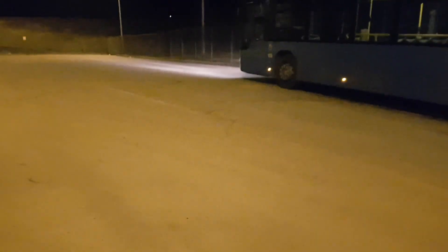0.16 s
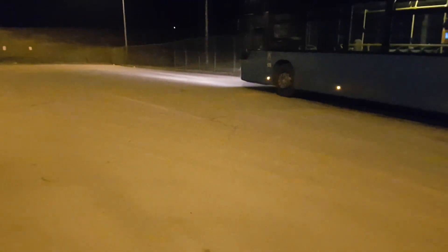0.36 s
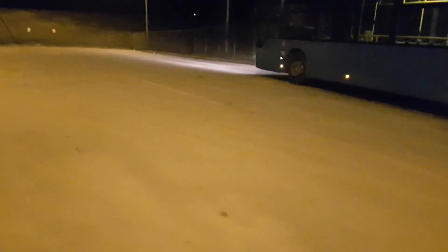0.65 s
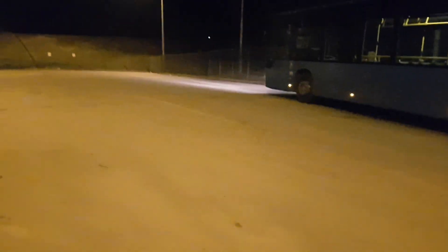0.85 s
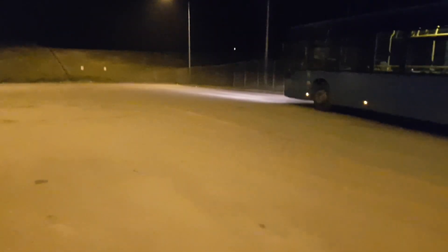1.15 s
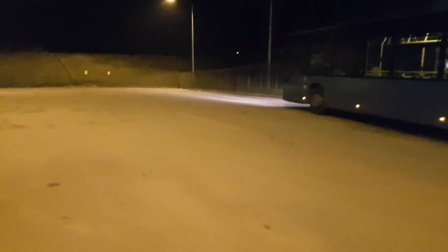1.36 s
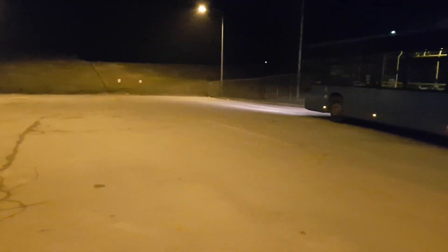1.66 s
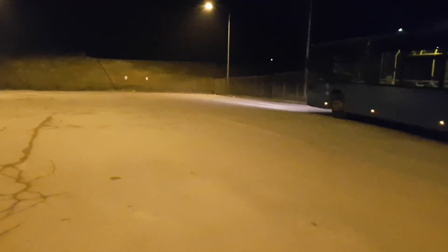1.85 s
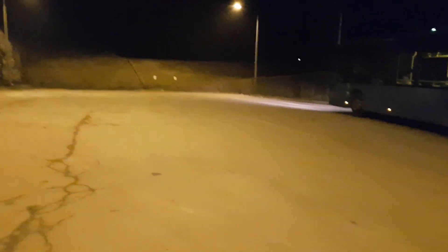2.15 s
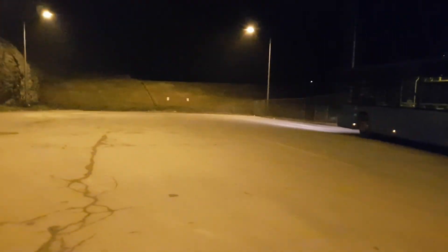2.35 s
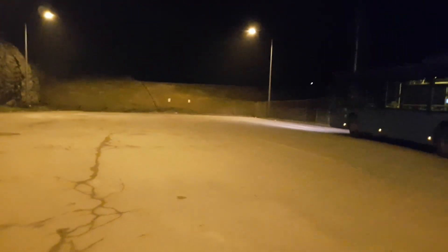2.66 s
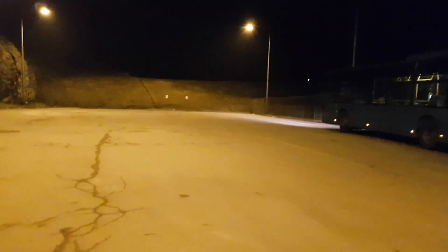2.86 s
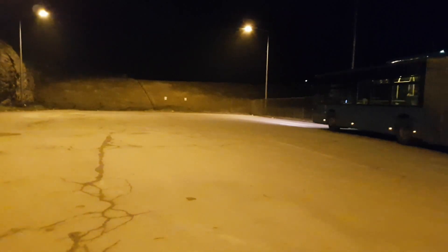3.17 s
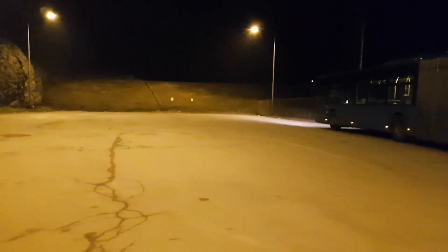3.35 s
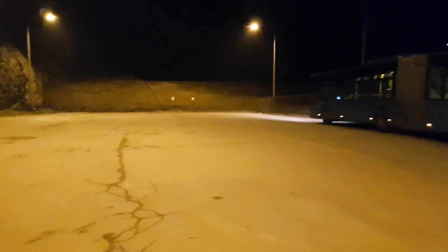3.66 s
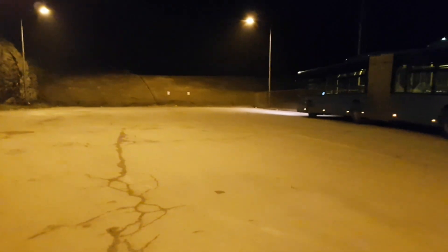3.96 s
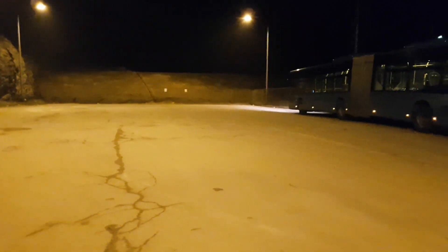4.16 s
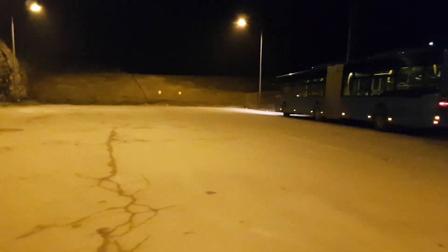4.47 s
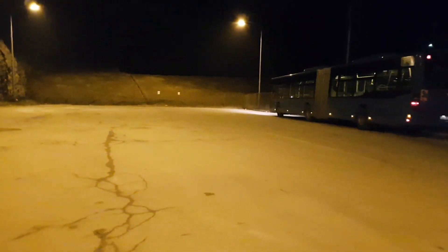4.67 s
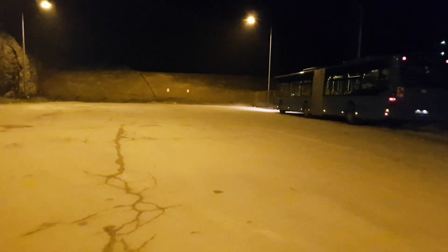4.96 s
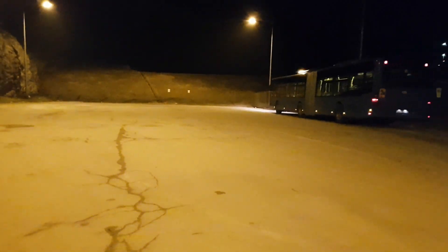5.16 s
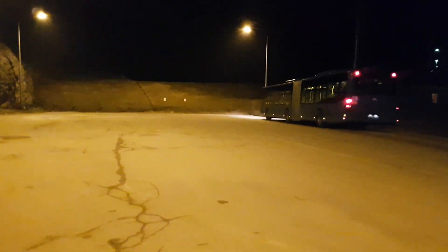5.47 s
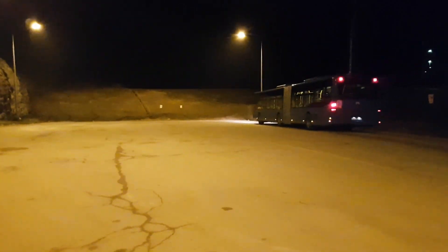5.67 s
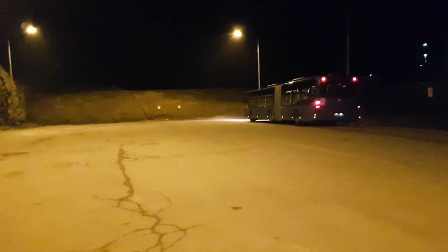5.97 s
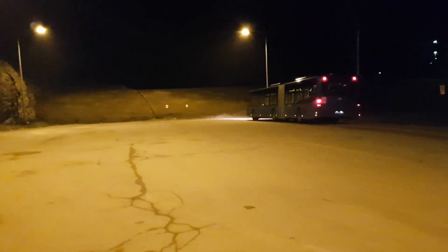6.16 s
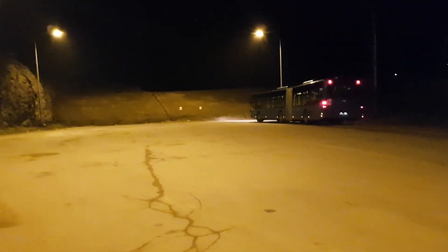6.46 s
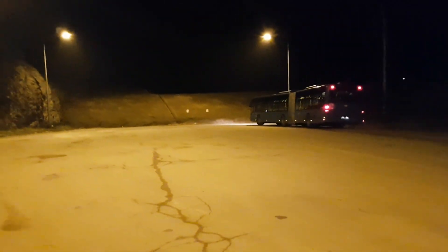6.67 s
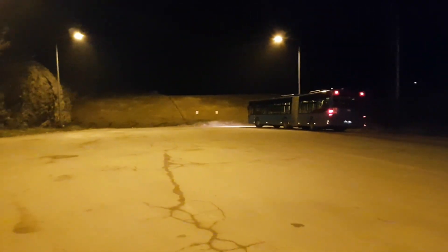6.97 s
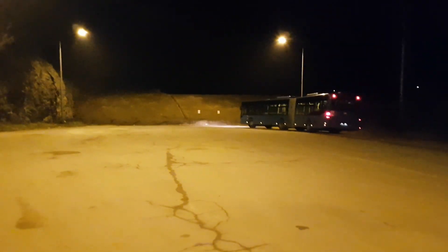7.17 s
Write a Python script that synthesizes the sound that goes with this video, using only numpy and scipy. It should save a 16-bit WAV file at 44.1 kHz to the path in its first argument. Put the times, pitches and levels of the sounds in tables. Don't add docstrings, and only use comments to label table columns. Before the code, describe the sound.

Outdoors on an open paved lot at night, a hand-held stereo phone hears a large diesel bus close on the right. From 0 s it pulls hard: a deep, dense exhaust growl rises smoothly to more than double its starting pitch by 4.6 s, with metallic gear whine climbing above it. Air roar, clatter, hiss and tyre rumble thicken from about 1 s. A thin turbo whistle emerges near 2.3 s, rises and is strongest around 3.8 s, as the sound shifts from the right towards ahead. At 4.7 s the power lifts; two dull gulps thump around 4.8 s, engine and whistle slide quickly down and air sighs out. From 5.4 s the bus coasts away, much quieter, with faint gulps, tyre rolling and a soft mid-low axle hum. Light sideways tyre scrub swells at 6.6 s and lingers. Sparse tiny grit cracks tick nearby throughout; it ends still rolling at 7.3 s.

```python
import sys
import numpy as np
from scipy import signal
from scipy.io import wavfile
from scipy.ndimage import map_coordinates

SR = 44100
rng = np.random.default_rng(int(sys.argv[2]) if len(sys.argv) > 2 else 0)


def undo_db(level):
    steps = np.asarray(level, float) / 20
    return 10 ** steps


def wav_record(signal):
    frames = np.transpose(np.atleast_2d(signal))
    bounded = np.clip(frames, -1, 1)
    quanta = np.round(bounded * 32767).astype(np.int16)
    wavfile.write(sys.argv[1], SR, quanta)


N = 322812
SECONDS = np.arange(N) / SR


def rms_one(x):
    return x / np.sqrt(np.mean(x ** 2) + 1e-20)


def in_time(rows):
    s, *columns = np.transpose(rows)
    return [np.interp(SECONDS, s, column) for column in columns]


def at_hz(points, hz, axis=1):
    table = np.array(points)
    return np.interp(np.log(hz), np.log(table[:, 0]), table[:, axis])


def drift(rate):
    r = np.exp(-64 * np.pi * rate / SR)
    noise = rng.standard_normal(N // 32 + 2002)
    slow = signal.lfilter([1], [1, -2 * r, r * r], noise)[2000:]
    return np.interp(np.arange(N) / 32, np.arange(len(slow)), rms_one(slow))


def follows(law, thrust_db, air_db, rolling_db, side):
    level_db, thrust_share, air_share, rolling_share, swing_db = law
    engine_db = thrust_share * thrust_db + air_share * air_db
    return level_db + engine_db + rolling_share * rolling_db + swing_db * side


def ringing_db(modes, hz):
    power = sum(undo_db(db) ** 2 / (1 + (2 * (hz - top) / width) ** 2) ** 2 for top, width, db in modes)
    return 10 * np.log10(power)


def bell(s, length):
    return np.exp(-((SECONDS - s) / length) ** 2)


def fades_db(rows):
    return sum(db * bell(s, length) for s, length, db in rows)


def swell_db(times, top_db, left_db):
    return np.interp(SECONDS, np.cumsum(times), [top_db - 15.5, top_db, top_db, left_db])


def resonance(hz, width):
    r = np.exp(-np.pi * width / SR)
    return (1 - r * r) / 2 * np.array([1, 0, -1]), [1, -2 * r * np.cos(2 * np.pi * hz / SR), r * r]


def tone(turns, level_db, wobble_db, rate=9.6):
    strength = np.sqrt(2) * undo_db(level_db + wobble_db * drift(rate))
    return strength * np.sin(2 * np.pi * (turns + rng.random()))


# (frequency [Hz], beside [dB], passing [dB], ahead [dB])
SHADE = [(100, -7, -1, 0), (400, 0.5, -0.5, -1), (686, 1, 3, -1), (1010, 3.5, 2.5, 1.5), (1590, 4, 1, -2.5),
         (2310, 0, -12.5, -5), (3330, 2, -12, 17), (3925, 5, -0.5, -8), (4390, -14.5, 10, 18),
         (5670, 10, -27, -3.5), (9200, -11, -1.5, 6), (15500, -7.5, -4, 2)]


def shade_db(hz, side):
    beside, passing, ahead = (at_hz(SHADE, hz, axis=k) for k in range(1, 4))
    near = beside * np.clip(1 - side, 0, 1)
    far = ahead * np.clip(side - 1, 0, 1)
    return near + passing * (1 - abs(side - 1)) + far


def placed(x, hz, side):
    half_db = shade_db(hz, side) / 2
    return x * undo_db(np.array([half_db, -half_db]))


MAIN_ORDERS = (1, 2, 3)
# (level [dB], thrust share [dB/dB], air share [dB/dB], rolling share [dB/dB], swing to the tail [dB])
MAIN_LAWS = [(0, 1.05, -0.00086, .01, .1), (-5.5, 1.1, -0.039, .01, 0.12), (-11, 0.98, -0.16, .01, 1.2)]
UNEVEN_LAW = (4, 0.43, 0.2, 0.2, -2.5)
# (time [s], length [s], loss [dB])
CANCELS = [
    [(5.25, 0.16, -11)],
    [(.47, 0.097, 12), (2.25, 0.27, 5), (2.85, 0.23, 3.5), (5.15, 0.1, -10)],
    [(.05, 0.22, 8.5), (1.1, 0.19, 6.5)],
]
# (frequency [Hz], width [Hz], level [dB])
SILENCER = [(44.8, 14.6, -15.5), (62.3, 33, -24.5), (84.6, 35, -17.5), (96.6, 13, -21), (124, 19, -12),
            (145.5, 18, -11.5), (164.2, 24, -14.5), (177.6, 9.8, -14), (191.9, 13.6, -10.5), (240, 13, -17),
            (263.7, 21, -17.5), (288.9, 11, -23)]
# (frequency [Hz], level [dB])
PIPE = [(30, -5), (90, -2.5), (125, -1), (160, -0.5), (192, 8), (225, -2.5), (290, 0.5), (350, -10),
        (450, -10.5), (700, 16.5)]
# (multiple of the firing rate, level [dB], gain per octave below full speed [dB])
UNEVEN = [(.5, -40.5, .1), (1.333, -43, .1), (1.5, -29, -0.5), (1.833, -48, .1), (2.167, -34.5, -1),
          (2.333, -35.5, -2), (2.833, -40, 2), (3.167, -39, 2), (3.333, -39.5, -3), (3.5, -40.5, 12),
          (3.833, -42.5, 0), (4.0, -33.5, -3.5), (4.5, -36.5, 5.5), (5.0, -38, 8), (5.333, -39, -2)]
# (frequency [Hz], level [dB])
PANEL = [(100, -29), (140, -41), (180, -41), (185, -21.5), (194, -13), (204, -22.5), (222, -32), (240, -49)]
FAINT_SIXTHS = (10, 16, 22, 25, 28, 31, 35)


def exhaust(hz, turns, drive):
    full_speed_hz, faint_db = 90, -45
    panel_order, panel_thrust_share = 2.5, 1.4
    fan_order, fan_db = 1.79, -31
    load_db = follows(UNEVEN_LAW, *drive)
    out = np.zeros(N)
    for order, law, cancels in zip(MAIN_ORDERS, MAIN_LAWS, CANCELS):
        level_db = follows(law, *drive) + ringing_db(SILENCER, order * hz) - fades_db(cancels)
        out += tone(order * turns, level_db, wobble_db=0.88)
    panel_db = panel_thrust_share * drive[0] + at_hz(PANEL, panel_order * hz)
    out += tone(panel_order * turns, panel_db, wobble_db=0.9)
    out += tone(fan_order * turns, fan_db + load_db + at_hz(PIPE, fan_order * hz), wobble_db=0.0)
    octaves_below = np.log2(full_speed_hz / hz)
    faint = [(k / 6, faint_db, 0) for k in FAINT_SIXTHS]
    for multiple, level_db, slow_db in list(UNEVEN) + faint:
        order = round(6 * multiple) / 6
        heard_db = level_db + slow_db * octaves_below + load_db + at_hz(PIPE, order * hz)
        out += tone(order * turns, heard_db, wobble_db=1.6, rate=3.0)
    return out * undo_db(np.array([[-.45], [.45]]))


GEAR_MESH = (16.71, 18.29, 8.33, 25.04)
# (level [dB], thrust, air and rolling shares [dB/dB], swing to the tail [dB])
GEAR_LAWS = [(1, 0.75, 0.18, .01, -0.8), (0.9, 0.65, 0.33, .01, 0.15), (2.5, 0.59, 0.11, .01, -6),
             (-11, 0.33, 0.41, .01, 2)]
# (time [s], length [s], loss [dB])
GEAR_FADES = [
    [(1.4, .2, -5), (3.15, 0.13, 8), (3.75, 0.11, -1), (4.45, .12, 4), (5.0, 0.25, -4)],
    [(.5, 0.55, 6), (2.65, .15, 5), (2.95, .08, -1), (3.55, 0.092, 2), (4.1, .35, 1), (4.62, .08, 5),
     (5.0, 0.16, -6), (5.42, 0.097, -5)],
    [(1.5, .6, -4), (2.35, .15, 5), (2.95, .1, -9), (5.22, .08, -6)],
    [(1.5, .4, 8), (3.3, .3, 1), (4.3, .15, 6), (5.25, .1, -5)],
]
# (frequency [Hz], width [Hz], level [dB])
CASING = [(420, 220, -39.5), (610, 69, -34), (915, 91, -26), (1100, 47, -23.5), (1165, 60, -32),
          (1317, 120, -27), (1414, 86, -25.5), (1513, 65, -32), (1606, 49, -21.5), (1712, 114, -24),
          (1950, 170, -32), (2410, 220, -27.5)]
# (frequency [Hz], width [Hz], level [dB])
OCTAVE_PEAK = [(3260, 130, 6), (3490, 160, 2), (3000, 3000, -0.5)]


def gears(hz, turns, drive):
    octave_db = -18
    hidden_until_s, hidden_db = 2.76, 11
    mesh_slack_turns, overrun_slack_turns = .04, .2
    levels_db = []
    for order, law, fades in zip(GEAR_MESH, GEAR_LAWS, GEAR_FADES):
        levels_db.append(follows(law, *drive) + ringing_db(CASING, order * hz) - fades_db(fades))
    levels_db[0] = levels_db[0] - hidden_db * np.clip((hidden_until_s - SECONDS) / .15, 0, 1)
    first, second = 2 * GEAR_MESH[0], 2 * GEAR_MESH[1]
    meshes = list(zip(GEAR_MESH, levels_db))
    meshes.append((first, levels_db[0] + octave_db))
    meshes.append((second, levels_db[1] + octave_db + ringing_db(OCTAVE_PEAK, second * hz)))
    slack = np.interp(drive[0], [-10, -2], [overrun_slack_turns, mesh_slack_turns])
    out = 0
    for order, level_db in meshes:
        mesh = tone(order * turns + slack * drift(15.0), level_db, wobble_db=1.2, rate=8.0)
        out = out + placed(mesh, order * hz, drive[-1])
    return out


# (frequency [Hz], density [dB per Hz])
ROAR = [(100, -45), (200, 0.5), (300, -6), (420, -5), (560, -1.5), (680, -0.5), (800, -10), (1000, -43),
        (1500, -50.5)]
DRUM = [(200, -45), (400, -3), (700, -6), (1000, 3.5), (1300, 0), (1600, 0.5), (2200, -8.5), (3200, -20),
        (3900, -41), (5000, -19.5), (6200, -49)]
CLATTER = [(600, -45), (1200, -46.5), (1900, 3.5), (2400, -2.5), (3100, -5.5), (3700, -13), (4600, -6),
           (5600, -8.5), (7000, -86)]
HISS = [(4000, 10), (6200, 3), (7500, 0.5), (9000, 1.5), (10500, -0.5), (12700, 0), (14500, -2),
        (16000, -3)]
RUMBLE = [(30, -23), (55, -5), (80, 5.5), (125, 8), (170, 1.5), (230, -6), (300, -23), (400, -32)]
BOOM = [(120, -45), (200, -9.5), (270, 8.5), (330, 4.5), (400, -5), (500, -30), (800, -37.5)]
TREAD = [(1400, -12), (2000, -5), (2550, 4.5), (3100, -4), (3800, -8), (5100, -3), (6100, -17), (8000, -34)]
SCRUB = [(600, -8), (900, 3.5), (1300, 2), (1700, 1), (2200, -11), (3000, -6), (3600, -14.5), (4200, -44)]
SIGH = [(5000, -25), (7000, 1), (8500, 0), (10500, -3), (12000, -6), (14000, -20)]
NIGHT = [(28, -4), (40, 3), (70, -12), (300, -4), (1500, -18), (3100, -33), (5000, -36), (8000, -60)]
# (level [dB], thrust, air and rolling shares [dB/dB], swing to the tail [dB])
ROAR_LAW = (-25, 0.16, 0.42, 0.21, 1.03)
DRUM_LAW = (-24.5, 0.55, 0.0345, 0.03, 2)
CLATTER_LAW = (-26, 0.43, 0.19, .1, -1.5)
HISS_LAW = (-27, 0.2, 0.75, -0.05, 0.22)
RUMBLE_LAW = (-24.5, 0.06, 0, 0.87, 0.5)
BOOM_LAW = (-24, 0.5, 0.17, 0, -6)
TREAD_LAW = (-33, 0.5, 0.5, .15, -0.6)
# (start [s], attack [s], hold [s], release [s])
SCRUB_TIMES = (6.5, 0.27, 0.13, .5)
SIGH_TIMES = (4.85, .15, 0.19, 0.66)
# (frequency [Hz], likeness [0-1])
LIKENESS = [(100, .995), (500, .97), (1000, .97), (1500, .96), (2500, .88), (4000, .78), (8000, .62),
            (15000, .6)]


def broad_noise(turns, drive):
    scrub_db, scrub_left_db, sigh_db, night_db = -30, -33, -41, -47
    sources = [   # colour, level [dB], depth of throb [0-1]
        (ROAR, follows(ROAR_LAW, *drive), 0.00082),
        (DRUM, follows(DRUM_LAW, *drive), 0.082),
        (CLATTER, follows(CLATTER_LAW, *drive), 0.18),
        (HISS, follows(HISS_LAW, *drive), 0.018),
        (RUMBLE, follows(RUMBLE_LAW, *drive), 0.06),
        (BOOM, follows(BOOM_LAW, *drive), 0.11),
        (TREAD, follows(TREAD_LAW, *drive), 0.03),
        (SCRUB, swell_db(SCRUB_TIMES, scrub_db, scrub_left_db), 0),
        (SIGH, swell_db(SIGH_TIMES, sigh_db, sigh_db - 25), 0),
        (NIGHT, night_db, 0)]
    edges = 28 * 2 ** (np.arange(29) / 3)
    centres = np.sqrt(edges[1:] * edges[:-1])
    knock = np.cos(2 * np.pi * turns)
    shares, powers = [], []
    for colour, level_db, depth in sources:
        band_power = undo_db(at_hz(colour, centres)) ** 2 * np.diff(edges)
        shares.append(band_power / band_power.sum())
        powers.append((undo_db(level_db) * (1 + depth * knock)) ** 2)
    out, gust, white = 0, drift(21.0), rng.standard_normal((2, 2, N))
    for k, hz in enumerate(centres):
        band = signal.butter(2, [edges[k], min(edges[k + 1], .45 * SR)], "band", fs=SR, output="sos")
        mid, apart = (rms_one(v) for v in signal.sosfilt(band, white[k % 2]))
        power = sum(p * share[k] for p, share in zip(powers, shares))
        patchy_db = np.interp(np.log2(hz), [8, 14], [.3, 1.6]) * (0.28 * gust + drift(30.0))
        alike = np.clip(at_hz(LIKENESS, hz), 0, 1)
        pair = np.sqrt((1 + alike) / 2) * mid + np.sqrt((1 - alike) / 2) * apart * [[1], [-1]]
        out = out + placed(pair * np.sqrt(power) * undo_db(patchy_db), hz, drive[-1])
    return out


# (frequency [Hz], width [Hz], middle [s], length [s], level [dB])
GROOVES = [
    (2480, 220, 5.2, .45, -48),
    (3150, 430, 7.0, .35, -52),
    (515, 82, .12, .12, -41),
    (530, 120, 6.5, 0.23, -43),
    (187, 16, 1.4, .6, -29),
    (280, 45, 1.85, .35, -30),
    (4900, 700, 6.4, .9, -58),
    (2200, 500, .2, .4, -42),
]


def grooves(side):
    out = 0
    for hz, width, s, length, level_db in GROOVES:
        ring = rng.standard_normal(N)
        for _ in range(2):
            ring = signal.lfilter(*resonance(hz, width), ring)
        out = out + placed(undo_db(level_db) * bell(s, length) * rms_one(ring), hz, side)
    return out


# (time [s], peak level [dB])
TICKS = [
    (.486, -38),
    (1.005, -25),
    (1.751, -28),
    (3.4655, -25),
    (4.78, -28),
    (4.886, -30),
    (5.6252, -28),
    (6.6414, -42),
    (7.246, -37),
    (7.2825, -26),
]


def ticks():
    out, decay = np.zeros((2, N)), np.exp(-np.arange(200) / (0.0017 * SR))
    for s, peak_db in TICKS:
        start = round(s * SR)
        out[:, start:start + 200] += undo_db(peak_db - 9) * decay * rng.standard_normal(200)
    return signal.sosfilt(signal.butter(1, 5000, "high", fs=SR, output="sos"), out)


# (time [s], frequency [Hz], level [dB])
TURBO = [
    (2.2, 6920, -50),
    (2.6, 8100, -44),
    (3.0, 8560, -37),
    (3.8, 9266, -34),
    (4.05, 9426, -42),
    (4.68, 9780, -50),
    (4.76, 9194, -35),
    (5.0, 7950, -44.5),
    (5.2, 7340, -55),
]


def turbo(side):
    hz, level_db = in_time([(1.6, 6710, -85)] + list(TURBO) + [(5.4, 6900, -80)])
    blur = signal.lfilter([.02], [1, -.98], rng.standard_normal(N))
    turns = np.cumsum(hz + 25 * drift(30.0)) / SR + .12 * rms_one(blur)
    turns = turns + .3 * np.array([drift(25.0), drift(25.0)])
    return placed(tone(turns, level_db, wobble_db=2.5, rate=76.0), hz, side)


# (time [s], peak level [dB])
GULPS = [
    (4.818, -10),
    (4.853, -12),
    (5.356, -19),
    (5.455, -22),
    (5.83, -23),
    (5.988, -26),
    (6.375, -24),
]


def gulps():
    pipe_hz, t60_s = 150, .03
    t, out = np.arange(2000) / SR, np.zeros(N)
    dip = -np.sin(2 * np.pi * pipe_hz * t) * undo_db(-60 * t / t60_s)
    for s, peak_db in GULPS:
        start = round((s - .25 / pipe_hz) * SR)
        out[start:start + len(t)] += undo_db(peak_db) * dip / -dip.min()
    return out


# (time [s], frequency [Hz], level [dB])
AXLE = [
    (5.4, 462, -61),
    (5.55, 456, -46),
    (6.0, 449.5, -44.5),
    (6.15, 460.8, -56),
    (6.35, 459.7, -46),
    (6.85, 435.4, -46),
    (7.1, 422, -51),
]


def axle():
    hz, level_db = in_time([(5, 469, -76)] + list(AXLE))
    return tone(np.cumsum(hz) / SR, level_db, wobble_db=1.5)


def notched(x, notches, swing):
    for hz, width, beside, ahead in notches:
        depth = np.clip(beside + (ahead - beside) * swing, 0, .95)
        x = x - depth * signal.lfilter(*resonance(hz, width), x)
    return x


# (time [s], frequency [Hz], depth [0-1])
RIGHT_NOTCH = [(0, 6660, 0.68), (2.4, 6840, 0.75), (3, 6164, 0.75), (3.5, 4650, 0.94), (4, 4030, 0.95),
               (4.8, 4100, 0.77), (5.4, 3600, 0.6), (5.8, 3370, 0.5), (6.1, 2530, 0.31), (7.32, 2380, 0.4)]


def sinking_notch(x, share):
    hz, depth = in_time(RIGHT_NOTCH)
    out, state = x.copy(), np.zeros(2)
    for i in range(0, N, 256):
        band, state = signal.lfilter(*resonance(hz[i], share * hz[i]), x[i:i + 256], zi=state)
        out[i:i + 256] -= np.clip(depth[i], 0, .95) * band
    return out


# (frequency [Hz], width [Hz], depth beside [0-1], depth ahead [0-1])
LEFT_NOTCHES = [(2240, 660, 0.14, 0.89), (3604, 660, 0.85, 0.68), (5700, 2640, 0.69, 0.71),
                (6300, 700, 0.15, 0.3), (9100, 670, 0.4, 0.6), (11100, 1400, 0, 0.56),
                (12800, 1500, 0.05, 0.7)]
RIGHT_NOTCHES = [(5280, 1570, 0.81, .05), (7080, 1300, .05, 0.67), (9300, 500, 0.044, 0.38),
                 (12700, 2500, 0.34, 0.65)]


def microphones(left, right, lag, low_lag, side):
    low_band = signal.butter(2, [650, 1950], "band", fs=SR, output="sos")
    low = signal.sosfiltfilt(low_band, left)
    bass = signal.sosfiltfilt(signal.butter(2, 650, fs=SR, output="sos"), left - low)
    treble = left - low - bass
    delayed = 0
    for band, delay in ((bass, 0.78 * lag), (low, low_lag), (treble, lag)):
        delayed = delayed + map_coordinates(band, [np.arange(N) - delay], mode="nearest")
    left = notched(delayed, LEFT_NOTCHES, np.clip(0.58 * side, 0, .85))
    right = sinking_notch(notched(right, RIGHT_NOTCHES, side / 2), share=0.72)
    return np.array([left, right])


# (time [s], firing rate [Hz], thrust as heard [dB], air flow through the engine [dB])
DRIVE = [(0, 42.35, -2, -37.5), (.45, 49.82, 0.5, -24), (.9, 57.5, 0.5, -13), (1.35, 64.4, 0, -9),
         (1.8, 71.7, 0.5, -4.5), (2.25, 77.43, -1, -2.5), (2.75, 82.87, 0, -1), (3.3, 87.36, -0.5, -2),
         (3.85, 91.64, 0.5, 0.5), (4.3, 94.8, -0.5, 1), (4.6, 96.3, 0, -0.5), (4.72, 93.8, 0, -1),
         (4.9, 80.9, -10.5, -5.5), (5.05, 71.4, -17, -8), (5.25, 63.8, -21, -13), (5.5, 56.93, -23.5, -25),
         (6.1, 52.34, -28.5, -22), (7.32, 47.36, -25, -21.5)]
# (time [s], level [dB])
ROLLING = [
    (0, -20),
    (1, -9.5),
    (1.6, -3),
    (3, -4.5),
    (4, -1),
    (4.7, -3.5),
    (5.3, -5.5),
    (6.2, -10.5),
    (6.6, -12.5),
    (7.32, -15),
]
# (time [s], left lag [samples], middle-pitch lag [samples], 0 = beside / 1 = passing / 2 = ahead)
BEARING = [(0, 20.2, 17, 0.076), (1.2, 20.5, 20.4, 0.25), (1.9, 19.9, 19.9, 0.3), (2.75, 19.04, 19.4, 0.35),
           (3.5, 15.2, 18.4, 1.1), (4, 12.4, 16.4, 1.62), (4.4, 9.7, 13.3, 1.6), (4.75, 8.6, 10.6, 1.69),
           (5.25, 7.2, 9.5, 1.76), (5.75, 5.17, 5.94, 2.33), (6.4, 4.05, 4.3, 2.55), (7.32, 3.1, 2.9, 2.2)]


def scene():
    hz, thrust_db, air_db = in_time(DRIVE)
    lag, low_lag, side = in_time(BEARING)
    side = np.clip(side, 0, 2)
    turns = np.cumsum(hz) / SR
    drive = thrust_db, air_db, *in_time(ROLLING), side
    bus = exhaust(hz, turns, drive) + gears(hz, turns, drive) + broad_noise(turns, drive)
    bus = bus + grooves(side) + turbo(side) + gulps() + axle()
    left, right = bus
    return microphones(left, right, lag, low_lag, side) + ticks()


def top_cut(x):
    return signal.sosfilt(signal.butter(12, 15850, fs=SR, output="sos"), x)


def record(dry):
    ceiling, cutoff_hz = .9, 15800
    pushed = dry / ceiling
    limited = ceiling * np.tanh(pushed * (1 + pushed ** 2 / 4))
    mix = signal.sosfilt(signal.ellip(10, .5, 40, cutoff_hz, fs=SR, output="sos"), limited)
    return top_cut(mix)


dry = scene()
out = record(dry)
wav_record(out)
```